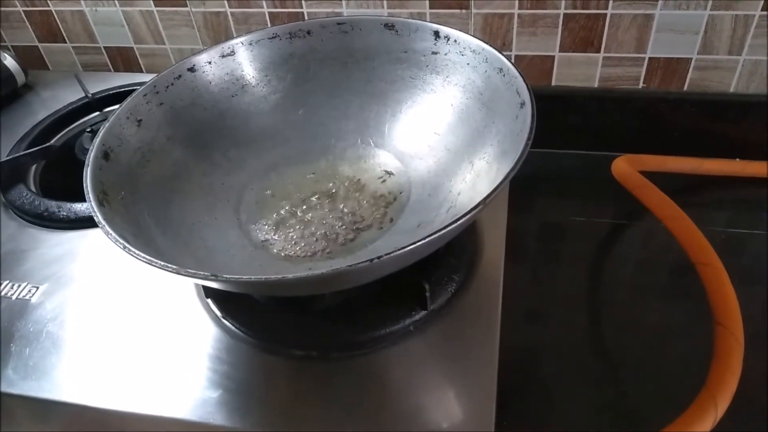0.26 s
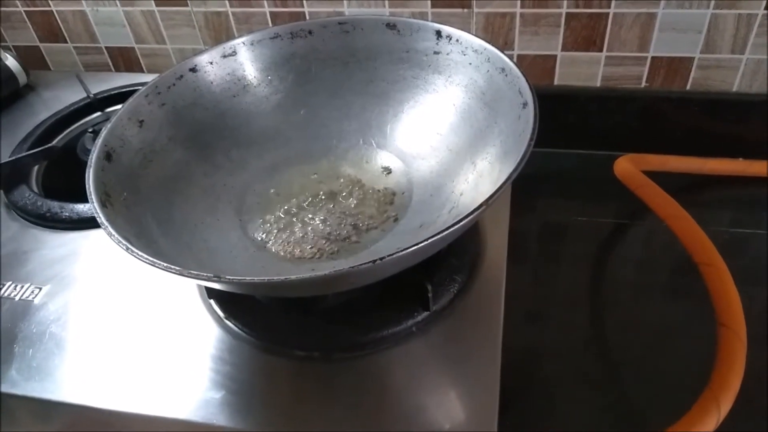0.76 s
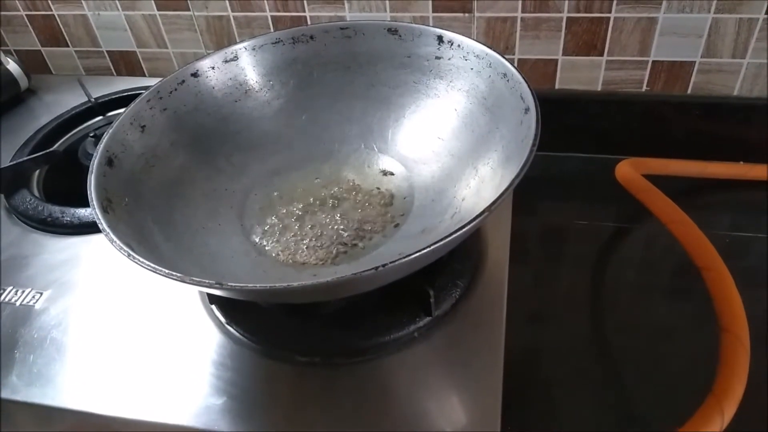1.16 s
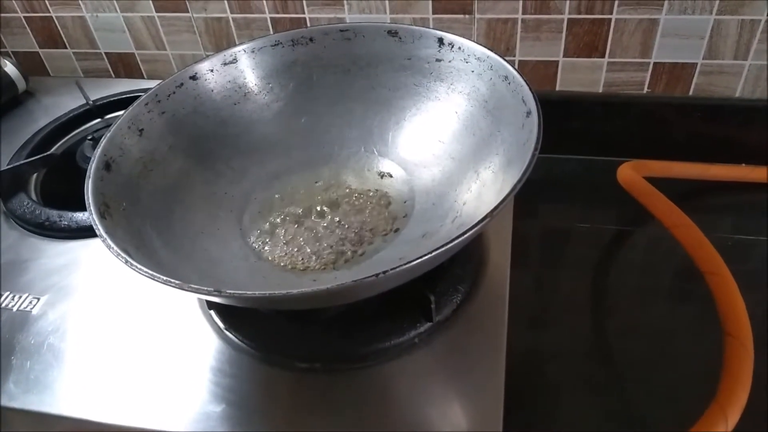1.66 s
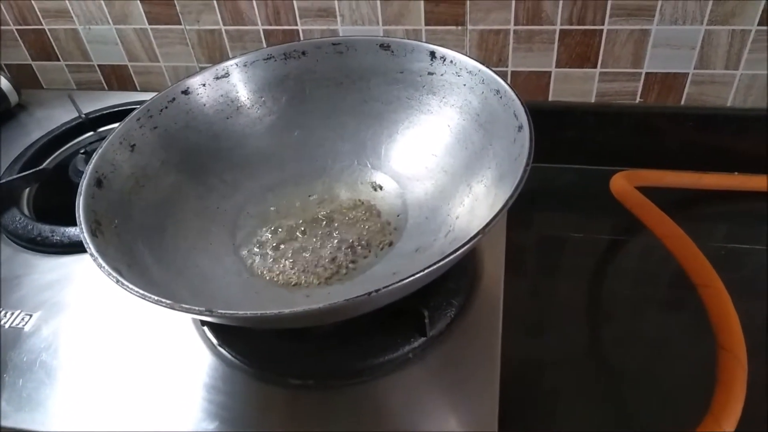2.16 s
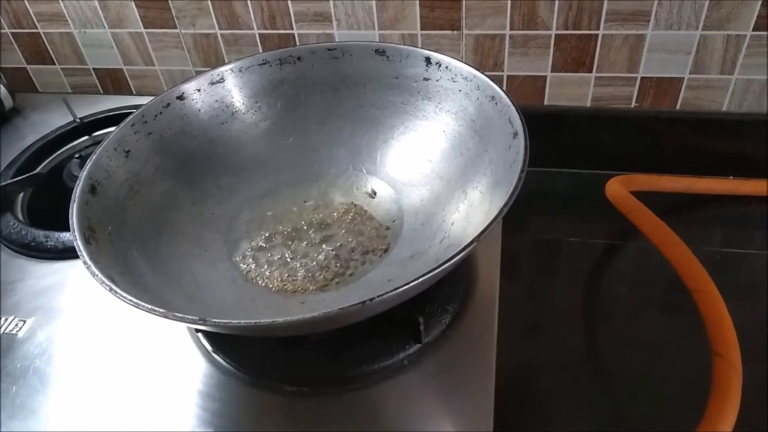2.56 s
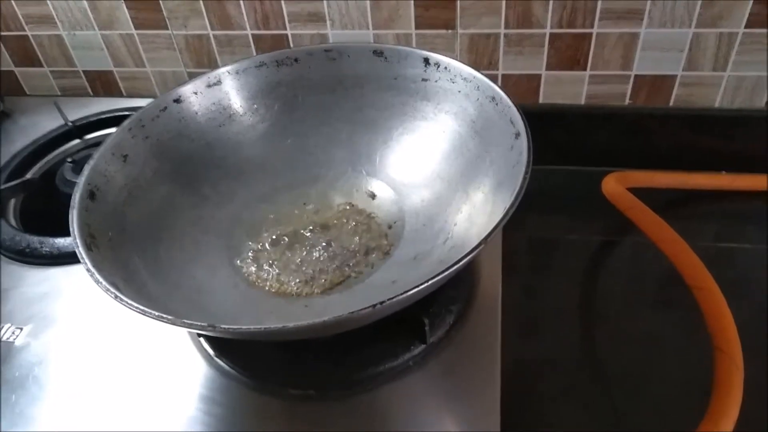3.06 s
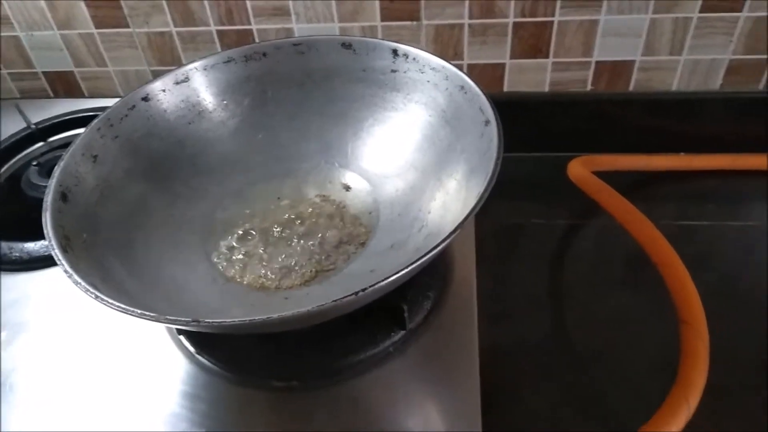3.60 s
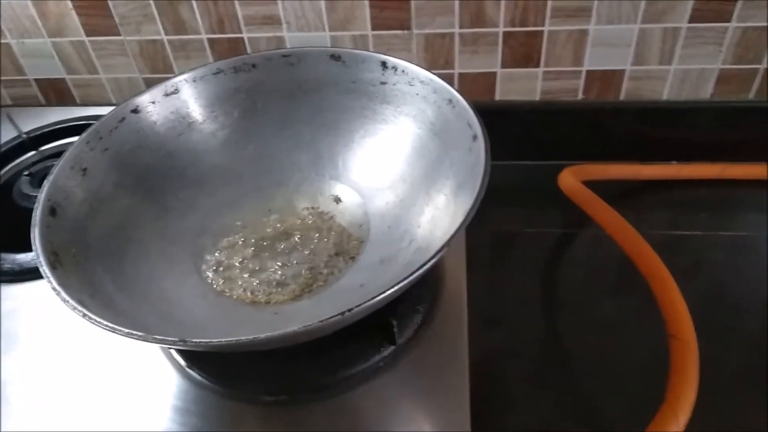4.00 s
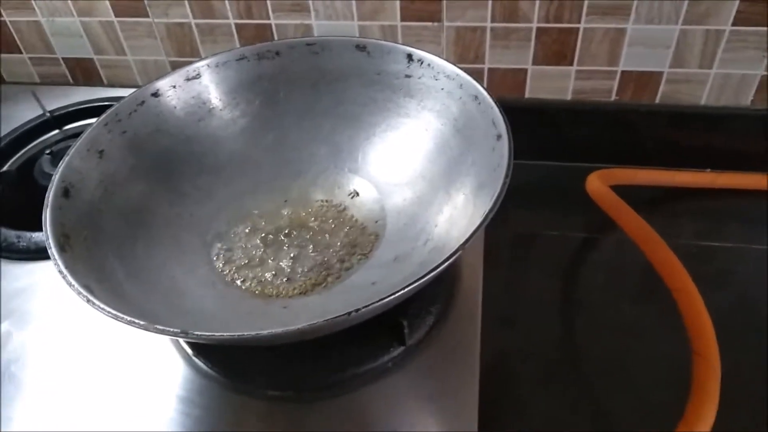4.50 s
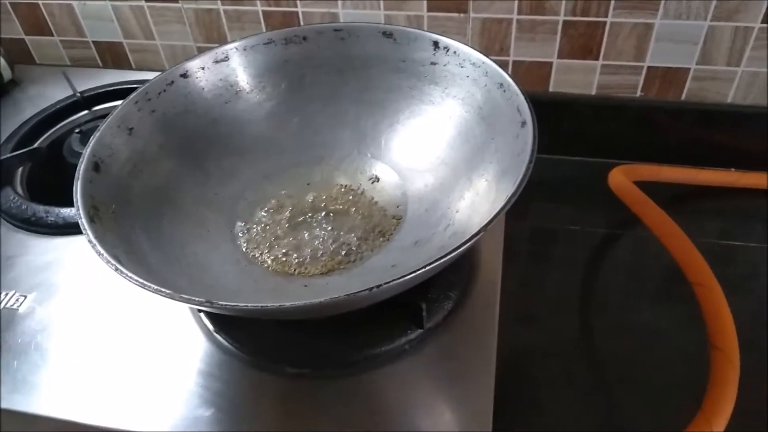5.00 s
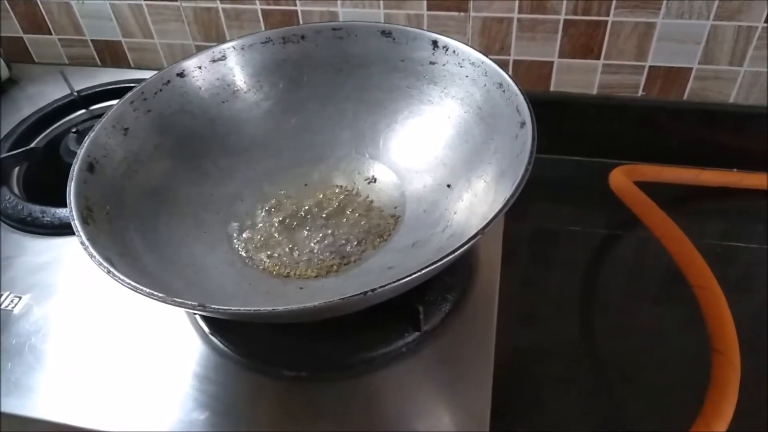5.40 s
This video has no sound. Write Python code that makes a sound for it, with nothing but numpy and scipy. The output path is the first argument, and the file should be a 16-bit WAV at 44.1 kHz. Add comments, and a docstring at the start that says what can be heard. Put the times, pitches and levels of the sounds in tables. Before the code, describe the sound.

Seeds crackle in hot oil in a steel wok, sharp snaps and hollow knocks growing denser over a fine simmer and low burner rush.

```python
"""A tiled kitchen, close to a gas stove: seeds fry in a spoonful of hot oil in a steel wok.
Each seed bursts with a snap of its husk and a knock of the steam pocket under it, both shaped resonances;
the tail behind it is held up for a moment, and larger oil bubbles plop without a snap.
Bowl, tiles and room answer every pop with noise tails, slaps and a faint ring of the wok.
Behind lie the fine ticking simmer of the oil and the low, noisy rush and hum of the burner."""
import sys
import numpy as np
from scipy import signal
from scipy.fft import rfft, irfft, next_fast_len
from scipy.io import wavfile
from scipy.ndimage import uniform_filter1d

SR = 44100
rng = np.random.default_rng(int(sys.argv[2]) if len(sys.argv) > 2 else 0)


def transcribe(u):
    """Save the signal u as a 16-bit wav file named by the first command-line argument.

    u: samples, shape (n,) or (channels, n), limited to [-1, 1]; the rate is SR.
    q: integer samples, one column per channel.
    """
    v = np.clip(np.atleast_2d(u).T, -1, 1)
    q = np.round(v * 32767).astype(np.int16)
    wavfile.write(sys.argv[1], SR, q)


N = 249165

# every pop is built in a block of SIZE samples: its frequencies in Hz and its time axis in s
SIZE = 16384
HZ = np.maximum(np.arange(SIZE // 2 + 1) * SR / SIZE, 1)
AGE = np.arange(SIZE) / SR


def seeds(tail_db=1.5):
    """Each burst and plop reaches the two microphone ports directly and by way of the kitchen."""
    # bursting seeds: [t/s, snap level/dB, husk f/Hz, brightness/(dB per octave),
    # knock level/dB, pocket f/Hz, held tail level before room and tail gains/dB]
    pops = [(0.1143, 16.5, 7300, 2, -25, 1700, -1), (0.3752, 5.5, 7050, 3, -21, 1520, -16.5),
            (0.8626, 2, 5300, -20, 0, 1300, -36), (1.318, -15, 4060, -7, -11.5, 1260, -11),
            (1.7344, 10, 6500, 4, -9.5, 1510, -0.5), (1.9803, 3, 6360, 3, -17, 1570, -20),
            (2.1631, 3.5, 6350, -17.5, 9, 1730, -11), (2.302, 7.5, 4020, -18, 10.5, 1640, -5.5),
            (2.353, 14, 5200, -7.5, -18, 690, -22), (2.4516, -11.5, 5100, -2, -10.5, 1830, -14),
            (2.6726, 2.5, 6570, -4.5, -23, 840, -14.5), (2.792, 14.5, 7750, -12, -18, 1640, -4),
            (2.9106, -9, 4270, -23, -18.5, 2270, -13), (2.9787, -10, 5000, 0, -11, 2050, -17),
            (3.029, 2, 6300, -26, 7.5, 1680, -24), (3.1991, -9.5, 5570, -21, -32, 1980, -13),
            (3.324, 4, 6000, -1.5, 7, 2150, -6), (3.412, -3, 6450, -26, -25, 700, -25),
            (3.4467, -3.5, 5100, -9, -26, 1780, -19), (3.6754, -13, 4670, -11, 1, 1340, -49),
            (3.785, 3, 4460, -19, 7, 2130, -5.5), (4.0821, .5, 5670, -26, 2, 1470, -14.5),
            (4.3157, -9, 6800, 9, -34, 1580, -35), (4.4414, 7.5, 5100, -14.5, 8.5, 1520, -8.5),
            (4.6532, -7, 4040, -6, -9.5, 2540, -15), (4.6797, 0, 5000, -37, 7.5, 2200, -24),
            (4.8205, -1, 4530, -17, 1.5, 1450, -32), (4.939, 2.5, 6300, -5, -2.5, 1660, -30),
            (4.9628, 3.5, 4570, -35, -0.5, 2100, -27), (4.9878, 4, 4960, -11, 9.5, 1780, -32),
            (5.0186, 6, 5600, -34, 3, 2250, -51), (5.078, 3.5, 5030, -19, 5.5, 1610, -27),
            (5.2912, 17, 3700, -15, 2.5, 2050, -3), (5.394, 11.5, 6900, -3.5, -14, 775, -13.5),
            (5.4975, -1.5, 7300, -9, -8.5, 1570, -15), (5.517, 6.5, 3850, -24, -17, 800, -41),
            (5.616, -16.5, 7000, -10, -6.5, 1760, -31)]
    # dull plops of larger oil bubbles: [t/s, level/dB, f/Hz, room level before tail_db/dB]
    plops = [(.2178, 3.5, 830, -16), (0.2163, 7.5, 1440, -12), (.259, -9, 840, -3), (0.2861, 8, 1190, -18),
             (3.7851, 7.5, 964, -4), (3.784, 5.5, 1460, -4.5), (3.7874, -3.5, 423, -2)]
    # the left port faces away from the pan: its direct sound relative to the right [f/Hz, level/dB]
    port_shadow = [(300, -12), (1200, -0.5), (2200, -10), (5000, -58), (9000, -0.5), (15000, 3)]
    # what the kitchen sends back to the left port [f/Hz, level/dB]
    room_left = [(60, -6.5), (200, 7.5), (1100, 4), (2100, -7), (3000, 4.5), (4500, 3), (7500, -4),
                 (10000, 13.5), (15000, -0.5)]
    # what the kitchen sends back to the right port [f/Hz, level/dB]
    room_right = [(60, -15), (200, 8.5), (1500, 4.5), (2300, 5.5), (5000, 2), (7500, -4), (15000, 7)]
    # a pop with a stronger held tail also has a louder room tail
    room_db_per_hold_db = 0.22
    plop_q = 2.6

    direct = np.array([causal(gain_at(port_shadow, HZ)), np.ones(len(HZ))])
    kitchen = np.array([causal(gain_at(side, HZ)) for side in (room_left, room_right)])
    echoes = surroundings()

    sounds = []
    for s, *pop, hold_db in pops + faint_pops():
        sounds.append((s, seed(*pop), room_db_per_hold_db * hold_db, hold_db))
    for s, db, hz, room_db in plops:
        sounds.append((s, plop(db, hz, plop_q), room_db, -np.inf))  # no held tail after a plop

    out = np.zeros((2, N))
    for s, spectrum, room_db, hold_db in sounds:
        near = direct * rfft(bowl())
        far = undb(room_db + tail_db) * kitchen * rfft(wash(hold_db) + echoes)
        add(out, irfft(spectrum * (near + far)), s)
    return out


def seed(snap_db, husk_hz, bright_db, knock_db, pocket_hz):
    """Spectrum of a seed: its crack follows its brightness, its pocket how dry and how hard it bursts."""
    # a dry burst (much snap, little knock) damps the pocket
    pocket_q = 2.56 * undb(-0.14 * (snap_db - knock_db))
    # a harder burst, by snap or knock, drives the pocket's overtone more
    overtone_db = -9 + 0.57 * max(snap_db, knock_db)
    # a dull burst is a cleaner ring of the husk with less crack
    crack_db = -7 + 0.033 * bright_db
    return burst(snap_db, husk_hz, bright_db, knock_db, pocket_hz, pocket_q, overtone_db, crack_db)


def burst(snap_db, husk_hz, bright_db, knock_db, pocket_hz, pocket_q, overtone_db, crack_db,
          husk_q=3.12, overtone=1.37, thud_db=-25, thud_hz=1500):
    """The husk cracks and rings; the steam pocket knocks in two damped modes over a dull thud."""
    # a splitting husk [f/Hz, level/dB]
    husk_spectrum = [(100, -23.5), (700, -27), (2500, -16), (3500, -17.5), (4300, -1.5), (7600, 2),
                     (8600, -11.5), (11000, -19), (15500, -27.5)]
    # the brightness slope starts at 6500 Hz and levels off 0.7 octave higher
    tilt = undb(bright_db * np.clip(np.log2(HZ / 6500), 0, .7))
    crack_and_ring = np.hypot(undb(crack_db), resonance(husk_hz, husk_q))
    snap = undb(snap_db) * gain_at(husk_spectrum, HZ) * tilt * crack_and_ring

    upper_mode = undb(overtone_db) * resonance(overtone * pocket_hz, pocket_q)
    modes = np.hypot(resonance(pocket_hz, pocket_q), upper_mode)
    thud = undb(thud_db) / np.sqrt(1 + (HZ / thud_hz) ** 4)
    knock = undb(knock_db) * np.hypot(modes, thud)
    return causal(np.hypot(snap, knock))


def faint_pops(count=4):
    """Small seeds burst at loosely spread moments once the oil is busy, each with its own size and pitches."""
    from_s, spread_db, spread_octaves = 2.4, 4, 0.49
    snap_db, knock_db, hold_db, bright_db_per_octave = -16, -27, -13, -1
    husk_hz, pocket_hz = 5100, 1600
    times = from_s + (np.arange(count) + rng.random(count)) / count * (N / SR - from_s)
    pops = []
    for s, (size, husk, pocket) in zip(times, rng.standard_normal((count, 3))):
        pops.append((s, snap_db + spread_db * size, husk_hz * 2 ** (spread_octaves * husk),
                     bright_db_per_octave, knock_db + spread_db * size,
                     pocket_hz * 2 ** (spread_octaves * pocket), hold_db))
    return pops


def plop(db, hz, q):
    """Spectrum of a larger bubble that opens without a snap: one damped resonance."""
    return causal(undb(db) * resonance(hz, q))


def bowl(scatter_s=0.00074, direct_db=-1.0):
    """The straight path to each port, trailed by about a millisecond of reflections inside the bowl."""
    path = diffuse(SIZE) * AGE * np.exp(-AGE / scatter_s)
    path /= np.linalg.norm(path, axis=1, keepdims=True)
    path[:, 0] += 1
    return undb(direct_db) * path / np.linalg.norm(path, axis=1, keepdims=True)


def wash(hold_db, build_s=(.007, .004), hold_s=0.028, hold_width_s=0.028, hold_side_db=1.5,
         room_t60_s=0.15, late_db=-27, late_t60_s=0.74):
    """Diffuse noise tail at each port: the room dies away, and a brief swell holds the tail up for a moment."""
    room = undb(-60 * AGE / room_t60_s) + undb(late_db - 60 * AGE / late_t60_s)
    build_up = 1 - np.exp(-(AGE / np.array(build_s)[:, None]) ** 2)  # left, right
    room = room / np.linalg.norm(room) * build_up

    hold = np.exp(-.5 * ((AGE - hold_s) / hold_width_s) ** 2) * (1 - np.exp(-AGE / build_s[0]))
    # the swell is stronger on the left
    hold = hold / np.linalg.norm(hold) * undb(hold_db + hold_side_db * np.array([[1], [-1]]))

    # echoes arrive in clumps about a millisecond long
    clumps = undb(2.5 * unit(uniform_filter1d(rng.standard_normal((2, SIZE)), 50)))
    return diffuse(SIZE) * unit(clumps) * np.hypot(room, hold)


def surroundings(slap_db=-6, ring_db=-3):
    """What follows every pop alike: slaps from hard surfaces and decaying sine modes of the wok."""
    # reflections from counter and tiles, before slap_db: [delay t/s, left level/dB, right level/dB]
    slaps = [(.0026, -10, -46), (.0052, -49, -56), (.0084, -30, -9), (0.0107, -8, -10.5),
             (0.0155, -53, -14)]
    # faint ring of the wok, before ring_db: [f/Hz, level/dB, t60/s]
    wok_modes = [(456, -57, 0.64), (1032, -61, 0.66), (1702, -45.5, 0.18), (2090, -43, 0.18),
                 (2296, -44.5, 0.23), (4850, -53.5, 0.34), (7150, -55, 0.24), (7380, -55, 0.24)]
    ring = np.zeros(SIZE)
    for hz, db, t60 in wok_modes:
        ring += undb(db + ring_db - 60 * AGE / t60) * np.sin(2 * np.pi * hz * AGE)
    response = np.array([ring, ring])
    for delay, left_db, right_db in slaps:
        response[:, int(delay * SR)] += undb(slap_db + np.array([left_db, right_db]))
    return response


def simmer(rate=2500, spread_db=1.5, hiss_db=3.0):
    """Thousands of tiny steam bubbles tick in the oil; the room blurs them, heard as an even added hiss."""
    # tiny steam bubbles [f/Hz, level/dB]
    fizz = [(700, -12.5), (1800, -2.5), (2700, -5), (3400, -23.5), (4300, -4), (5800, 2), (7600, 0),
            (8700, -14.5), (11500, -16), (15500, -30.5)]
    level_db, start_db, settle_s = -60.5, 4, 0.36  # louder at first, then it settles
    sizes = undb(spread_db * np.minimum(rng.exponential(size=N), 7))
    happens = rng.random(N) < rate / SR  # rate in bubbles per second
    ticks = unit(happens * sizes * rng.choice([-1, 1], N))
    # the ticks are weaker on the left
    sound = ticks * np.array([[.4], [1]]) + undb(hiss_db) * rng.standard_normal((2, N))
    flicker_db = .5 * walk(40)
    db = level_db + start_db * np.exp(-np.arange(N) / SR / settle_s) + flicker_db
    return unit(colour(sound, fizz)) * undb(db)


def burner(level_db=3, hum_hz=140.1, hum_width_hz=10.2, hum_db=-4):
    """The flame rushes low and steady as shaped noise; a narrow noise band is its soft, uneven hum."""
    # gas flame and kitchen air [f/Hz, level/dB]
    flame = [(25, -32), (55, -19), (80, -18), (105, 3), (140, 1), (190, -2), (300, -4.5), (500, -9),
             (1000, -10.5), (2500, -32), (3500, -48)]
    # strength of the flame, before level_db: [t/s, level/dB]
    flame_strength = [(0.0, -71.5), (2.12, -72.5), (2.94, -69.5), (3.49, -72), (5.65, -69.5)]
    rush = colour(diffuse(next_fast_len(N, True)), flame)[:, :N]
    # steps away from the hum's centre, and level in dB
    skirt = [(-3, -60), (-1, -10), (0, 0), (1, -10), (3, -80)]
    hum_band = [(hum_hz + k * hum_width_hz, db) for k, db in skirt]
    hum = colour(rng.standard_normal(N), hum_band)
    flutter_db = .8 * walk(20)
    db = np.interp(np.arange(N) / SR, *np.transpose(flame_strength)) + flutter_db
    return (unit(rush) + undb(hum_db) * unit(hum)) * undb(db + level_db)


def undb(db):
    """Decibels to gain."""
    return 10 ** (np.asarray(db) / 20)


def unit(x):
    """Scale to rms 1."""
    return x / np.sqrt(np.mean(x ** 2))


def gain_at(points, hz):
    """Gain of a (Hz, dB) spectrum at the given frequencies, interpolated over log frequency."""
    f, db = np.transpose(points)
    return undb(np.interp(np.log(np.maximum(hz, 1)), np.log(f), db))


def colour(x, points):
    """Filter a sound by a (Hz, dB) spectrum."""
    n = next_fast_len(x.shape[-1])
    gain = gain_at(points, np.arange(n // 2 + 1) * SR / n)
    return irfft(rfft(x, n) * gain, n)[..., :x.shape[-1]]


def causal(gain):
    """Minimum-phase response with this gain: it starts at once and then rings out."""
    cepstrum = irfft(np.log(gain + 1e-9))
    # fold the negative times onto the positive ones
    cepstrum[1:SIZE // 2] *= 2
    cepstrum[SIZE // 2 + 1:] = 0
    return np.exp(rfft(cepstrum))


def resonance(hz, q):
    """Gain of a steep-sided resonance, 1 at its centre."""
    return 1 / (1 + (q * (HZ / hz - hz / HZ)) ** 2)


def walk(rate):
    """Smooth random wander with a spread near 1, from twice-smoothed steps at this rate in Hz."""
    k = max(int(SR / rate), 1)
    steps = np.repeat(rng.standard_normal(N // k + 2), k)
    return 1.3 * uniform_filter1d(uniform_filter1d(steps, k), k)[:N]


def diffuse(size, apart_hz=1100, bass_side_db=-13):
    """Noise at two close ports: nearly the same in the bass, unrelated in the treble."""
    mid, side = rng.standard_normal((2, size))
    hz = np.arange(size // 2 + 1) * SR / size
    share = gain_at([(apart_hz / 5, bass_side_db), (apart_hz, 0)], hz)
    difference = share * rfft(side) * np.array([[1], [-1]])
    return irfft((rfft(mid) + difference) / np.hypot(1, share), size)


def add(out, sound, s):
    """Mix a sound in at a time in seconds."""
    i = int(s * SR)
    out[:, i:i + SIZE] += sound[:, :max(N - i, 0)]


def scene():
    """Pops over simmer and flame; the stove stands to the right, so the left port hears it a little later."""
    left, right = seeds() + simmer() + burner()
    lag = 6  # samples
    return np.array([np.pad(left, (lag, 0))[:N], right])


def record(dry):
    """The microphone colours the sound and the recorder cuts the top above 16 kHz."""
    # thin in the deep bass, a little hollow between the knocks and the snaps [f/Hz, level/dB]
    microphone = [(40, -4), (90, 2.5), (2800, -2.5), (3500, -6), (4050, 0)]
    top_cut = signal.ellip(8, .2, 70, 16000, fs=SR, output="sos")
    return signal.sosfilt(top_cut, colour(dry, microphone))


dry = scene()
out = record(dry)
transcribe(out)
```